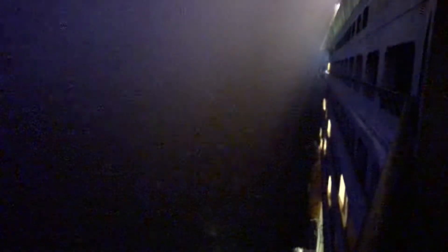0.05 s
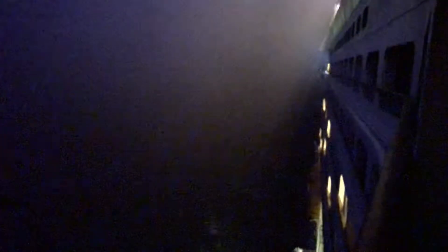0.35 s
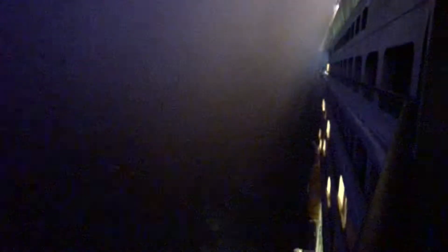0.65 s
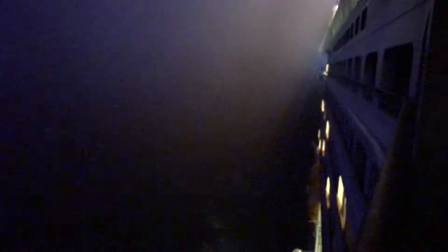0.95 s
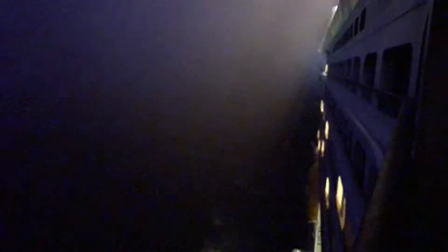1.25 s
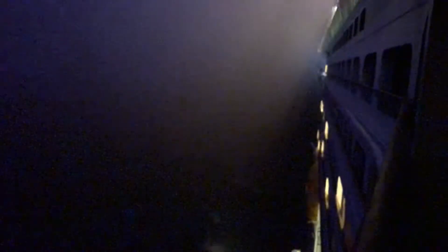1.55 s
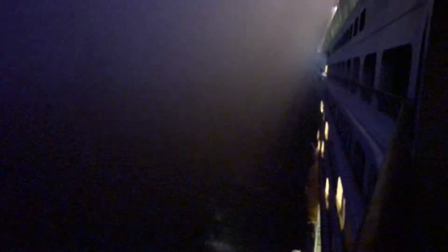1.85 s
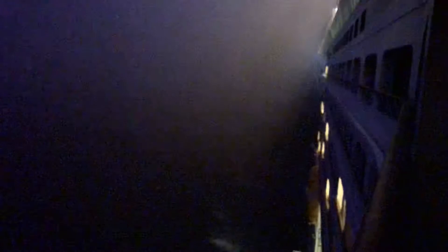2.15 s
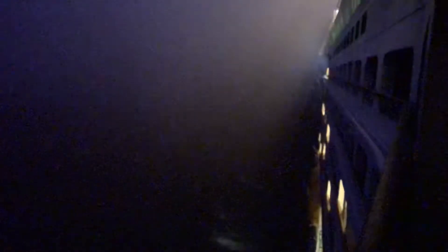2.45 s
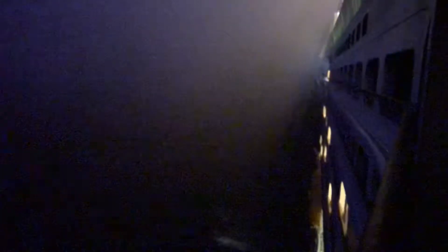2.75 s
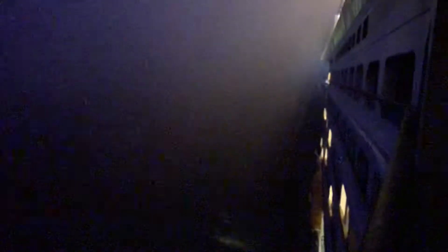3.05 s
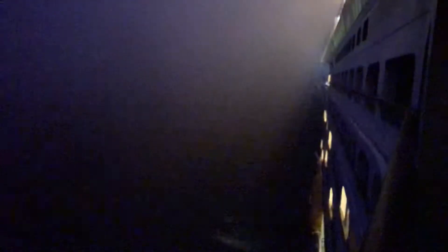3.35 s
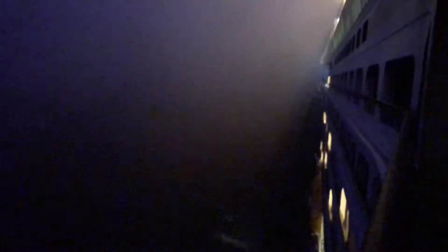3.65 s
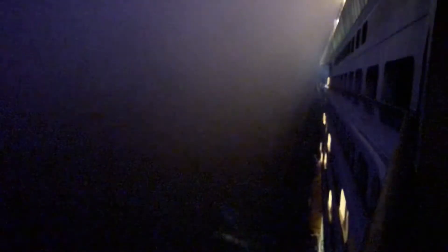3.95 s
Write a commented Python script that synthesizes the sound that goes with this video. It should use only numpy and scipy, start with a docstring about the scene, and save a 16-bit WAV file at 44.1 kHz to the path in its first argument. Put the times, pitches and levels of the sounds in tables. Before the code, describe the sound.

A very low ship horn blares on two beating pitches with a hiss of air, heard from the open side deck. It cuts off with a brief echo, leaving wind buffeting the microphone, faint engine hum and water wash.

```python
"""Two fog horns of a large ship, about a minor third apart, beat against each other over the side deck.
Their diaphragms chop compressed air into a boom, a blare and a hiss; the blast stops and rolls away
over the water. Under it the engines drone, the bow wave washes and sprays along the hull,
and gusts buffet the single microphone, out in the open on deck."""
import sys
import numpy as np
from scipy import signal
from scipy.fft import rfft, irfft, next_fast_len
from scipy.io import wavfile
from scipy.ndimage import uniform_filter1d, map_coordinates

SR = 44100
rng = np.random.default_rng(int(sys.argv[2]) if len(sys.argv) > 2 else 0)


def waveform_to_disk(signal):
    """Save audio, clipped to [-1, 1], as 16-bit WAV at the path in sys.argv[1]."""
    frames = np.transpose(np.atleast_2d(signal))
    scaled = np.clip(frames, -1, 1) * 32767
    samples = np.round(scaled).astype(np.int16)
    wavfile.write(sys.argv[1], SR, samples)


N = 176400


# Horn pitches, sagging with the air pressure: time_s, low_pitch_hz, high_pitch_hz
HORN_PITCH = [(0, 74.5, 86.92), (1.2, 74.5, 87.1), (1.7, 74.39, 86.9), (2.5, 74.2, 86.55)]
# Partials of each horn, heard from the side deck: harmonic, level_db
LOW_HORN = [(1, -24.5), (2, -16), (3, -26.7), (4, -36), (5, -40.3), (6, -39.5), (7, -40.5), (8, -45),
            (9, -48.5), (10, -47.5), (11, -50.5), (12, -55), (13, -57), (14, -60), (15, -59), (16, -65),
            (21, -66), (23, -72), (29, -75), (36, -74)]
HIGH_HORN = [(1, -17.2), (2, -19.7), (3, -42), (4, -52), (5, -47.5), (6, -53), (7, -51), (8, -53), (9, -57),
             (10, -58), (11, -57), (12, -62), (13, -62), (14, -64)]
# Swell of the low horn's boom (partials 1, 2, 4), body (3) and blare (5 up): time_s, gain_db
LOW_BOOM = [(0, -1.5), (.6, 3.5), (1.1, 0.1), (1.5, 0.7), (2.0, -2.6), (2.35, -5), (2.55, -4)]
LOW_BODY = [(0, 1), (.35, -1), (.7, -.5), (1.05, -3), (1.4, -4), (1.8, 2.2), (2.55, 2.2)]
LOW_BLARE = [(0, -.5), (.6, -1), (1.2, -1), (1.7, .5), (2.1, 0), (2.55, -1)]
# Swell of the whole high horn: time_s, gain_db
HIGH_SWELL = [(0, 0), (.55, 0.5), (1.1, -2), (1.6, 0), (2.2, 0.2), (2.55, 2.2)]

def horns():
    """Two diaphragms chop compressed air; the horns sound together and throb."""
    # The low horn's flipped sign and the high one's phase offset shape and time the beat.
    high_offset_s = .0023
    _, low_hz, high_hz = HORN_PITCH[0]
    low_phase = 2 * np.pi * np.cumsum(curve(HORN_PITCH, column=1)) / SR
    high_phase = 2 * np.pi * (np.cumsum(curve(HORN_PITCH, column=2)) / SR - high_offset_s * high_hz)
    boom, body, blare = curve(LOW_BOOM), curve(LOW_BODY), curve(LOW_BLARE)
    tones = np.zeros(N)
    for k, db in LOW_HORN:
        swell_db = body if k == 3 else boom if k <= 4 else blare
        tones -= horn_partial(k * low_phase, k * low_hz, db + swell_db)
    for k, db in HIGH_HORN:
        tones += horn_partial(k * high_phase, k * high_hz, db + curve(HIGH_SWELL))
    return tones + horn_air(low_phase, high_phase)


# A bright spot that wanders down through the overtones: time_s, centre_hz
BRIGHT_SPOT = [(0, 780), (.65, 745), (.95, 470), (1.25, 420), (1.6, 520), (1.95, 585), (2.3, 560),
               (2.55, 380)]

def horn_partial(phase, hz, level_db):
    """One partial: held while the valve is open, then a scattered echo dying over the water."""
    stop_s, cut_s, linger_s = 2.595, .055, .19
    bright_db, bright_width_hz = 4, 70
    upper = np.clip((hz - 200) / 160, 0, 1)  # 0 in the bass, 1 from 360 Hz up
    since_stop = np.arange(N) / SR - stop_s
    shut = np.clip(since_stop / cut_s, 0, 1)
    scattered = np.clip(.02 + .025 * upper * hz / 100 + .55 * shut, 0, 1)
    tone = np.exp(1j * (phase + .8 * upper * rng.standard_normal()))
    tone *= np.sqrt(1 - scattered ** 2) + scattered * flutter(22)
    drift = wobble(1.6)
    colour_db = 2.2 * upper * (drift - drift.mean())
    colour_db += bright_db * np.exp(-((hz - curve(BRIGHT_SPOT)) / bright_width_hz) ** 2)
    # As the valve shuts, upper partials drop less and linger, then fall twice as fast.
    cut_db = 7.5 * shut / (1 + 2 * upper)
    fall_db = 39 * (1 + upper) * np.maximum(since_stop - linger_s * upper, 0)
    return np.sqrt(2) * tone.real * amp(level_db + colour_db - cut_db - fall_db)


# Air rushing through the horns, and its brighter rasp: freq_hz, gain_db
AIR_SPECTRUM = [(150, -22), (300, -1), (400, 12), (520, -0.5), (700, -1.5), (900, -5.5), (1300, -9),
                (2000, -14.5), (3500, -19.5), (4600, -32), (8000, -49)]
RASP_SPECTRUM = [(500, -21), (800, 1.5), (950, 3.5), (1250, -1), (1600, -15.5), (2700, -20.5),
                 (3700, -17.5), (4600, -30), (7000, -53.5)]
# The air holds through the blast, the rasp swells near its end: time_s, level_db
AIR_LEVEL = [(0, -47), (.8, -44.5), (1.5, -44.5), (2.1, -43.5), (2.5, -45), (2.77, -43), (2.92, -56.5),
             (3.3, -77.5)]
RASP_LEVEL = [(0, -64), (.8, -56.5), (1.4, -56.5), (2.1, -55.5), (2.45, -46), (2.78, -47.5), (2.9, -62),
              (3.2, -74)]

def horn_air(low_phase, high_phase):
    """Escaping air hisses and rasps, pulsing with both diaphragms."""
    pulsing = unit(1 + .4 * (np.cos(low_phase) + .5 * np.cos(high_phase)))
    hiss = amp(curve(AIR_LEVEL)) * rush(AIR_SPECTRUM)
    rasp = amp(curve(RASP_LEVEL)) * rush(RASP_SPECTRUM)
    return pulsing * (hiss + rasp)


# Tones of the engine exhaust, heard on deck: pitch_multiple, level_db
ENGINE_TONES = [(1, -49), (2, -39.5), (2.33, -44), (3, -45), (3.5, -53), (4, -49.5), (5, -51), (6, -55),
                (7, -58.5), (8, -57.5), (9, -58.5), (10, -58.5), (11, -59.5), (12, -60.5), (13, -62)]

def engine():
    """The exhaust drones under the horns, each tone wavering in phase and level."""
    pitch_hz = 77.17
    phase = 2 * np.pi * pitch_hz * np.arange(N) / SR
    drone = np.zeros(N)
    for k, db in ENGINE_TONES:
        tone = np.exp(1j * (k * phase + 2 * wobble(1.995))) * (1 + .55 * flutter(16))
        waver = amp(2.5 * wobble(2.924))
        drone += amp(db) * unit(tone.real * waver)
    return drone


# Low wash, foam and fine spray along the hull: freq_hz, gain_db
WASH_SPECTRUM = [(20, -30.5), (50, -5), (90, 0), (150, 1.5), (300, -3.5), (420, -8), (600, -9.5),
                 (1000, -14), (1600, -21.5), (2500, -28.5), (4000, -35.5), (7000, -45.5), (12000, -52),
                 (15500, -46)]
FOAM_SPECTRUM = [(1500, -22.5), (3000, 1), (5200, 3), (7500, -0.5), (12000, -13.5), (15500, -8.5)]
SPRAY_SPECTRUM = [(2500, -15.5), (5000, 2), (9000, 1), (12500, 0.5), (15500, -6.5)]
# How each surges, heard from the deck above: time_s, level_db
WASH_LEVEL = [(0, -38.5), (2.8, -40), (3.1, -39), (3.45, -41), (3.65, -40.5), (4, -43)]
FOAM_LEVEL = [(0, -69), (.6, -63), (1.1, -70.5), (1.8, -77), (2.5, -68), (2.95, -73), (3.1, -67.5),
              (3.45, -74), (3.65, -66), (3.85, -75), (4, -70.5)]
SPRAY_LEVEL = [(0, -74), (.15, -74.5), (.28, -72), (.5, -75), (.7, -69.5), (.95, -73.5), (1.04, -68.5),
               (1.2, -75), (1.6, -80.5), (4, -80.5)]

def bow_wave():
    """The bow wave washes along the hull, foam hisses and fine spray ticks."""
    drops_per_s = 2500
    wash = amp(curve(WASH_LEVEL) + .24 * wobble(9.6)) * rush(WASH_SPECTRUM)
    foam = amp(curve(FOAM_LEVEL) + .6 * wobble(6.6)) * rush(FOAM_SPECTRUM)
    drops = (rng.random(N) < drops_per_s / SR) * rng.standard_normal(N)
    spray = amp(curve(SPRAY_LEVEL) + wobble(14)) * coloured(drops, SPRAY_SPECTRUM)
    return wash + foam + spray


# One small splash below the deck: freq_hz, gain_db
SPLASH_SPECTRUM = [(3500, -23), (5000, -3.5), (5800, -1), (7500, -10), (10000, -26)]

def splash():
    """A crest slaps the hull with a short hiss."""
    peak_s, peak_db, rise_s, fall_db_per_s = 3.0, -62, .025, 200
    since_peak = np.arange(N) / SR - peak_s
    rise = np.clip(1 + since_peak / rise_s, 0, 1)
    return rise * amp(peak_db - fall_db_per_s * np.maximum(since_peak, 0)) * rush(SPLASH_SPECTRUM)


# Rumble of wind right on the microphone: freq_hz, gain_db
WIND_SPECTRUM = [(15, -34), (28, -9.5), (42, 10), (110, 9), (200, -2), (350, -5), (700, -30), (1500, -72.5)]
# Gusts across the deck: time_s, level_db
GUST_LEVEL = [(0, -25), (.25, -29), (.42, -44), (.75, -42), (.97, -33), (1.08, -37), (1.2, -30),
              (1.28, -36), (1.36, -27), (1.5, -43), (2.1, -43), (2.4, -30), (2.57, -31), (2.7, -24),
              (2.88, -32), (3.05, -35), (3.3, -43), (3.8, -48), (3.87, -34), (4, -32)]

def wind():
    """Lumpy gusts buffet the microphone."""
    return amp(curve(GUST_LEVEL) + wobble(14)) * rush(WIND_SPECTRUM)


def amp(db):
    """Decibels to gain."""
    return 10 ** (np.asarray(db) / 20)


def unit(x):
    """Scale to rms 1."""
    return x / np.sqrt(np.mean(np.abs(x) ** 2) + 1e-20)


def curve(rows, column=1):
    """One column of a time table, one value per sample."""
    columns = np.transpose(rows)
    return np.interp(np.arange(N) / SR, columns[0], columns[column])


def wobble(knots_per_s):
    """A smooth random curve."""
    positions = np.linspace(0, N * knots_per_s / SR, 2048) + 2
    slow = map_coordinates(rng.standard_normal(1024), [positions], mode="wrap")
    return np.interp(np.arange(N), np.linspace(0, N, len(slow)), slow)


def flutter(knots_per_s):
    """Random amplitude and phase of a scattered tone."""
    return unit(wobble(knots_per_s) + 1j * wobble(knots_per_s))


def coloured(x, spectrum):
    """x through a (freq_hz, gain_db) spectrum, at rms 1."""
    size = next_fast_len(N + 8192)
    hz, db = np.transpose(spectrum)
    gain = amp(np.interp(np.log(np.fft.rfftfreq(size, 1 / SR) + 1), np.log(hz + 1), db))
    return unit(irfft(rfft(x, size) * gain, size)[:N])


def rush(spectrum, patchy_db=1.2):
    """Coloured noise with patches of random gain in frequency and time."""
    bins = signal.stft(rng.standard_normal(N), nperseg=512)[2]
    patches = uniform_filter1d(rng.standard_normal(bins.shape), size=7, axis=0)
    patches = uniform_filter1d(patches, size=14, axis=1)
    noise = signal.istft(bins * amp(patchy_db * unit(patches)), nperseg=512)[1][:N]
    return coloured(noise, spectrum)


def scene():
    """From the side deck, in mono: horns over engine, water and wind."""
    return (horns() + engine() + bow_wave() + splash() + wind())[None]


def record(dry):
    """The microphone chain passes nothing above its band limit."""
    top_hz = 15720
    size = next_fast_len(N + 8192)
    passband = np.fft.rfftfreq(size, 1 / SR) < top_hz
    return irfft(rfft(dry, size) * passband, size)[..., :N]


dry = scene()
out = record(dry)
waveform_to_disk(out)
```